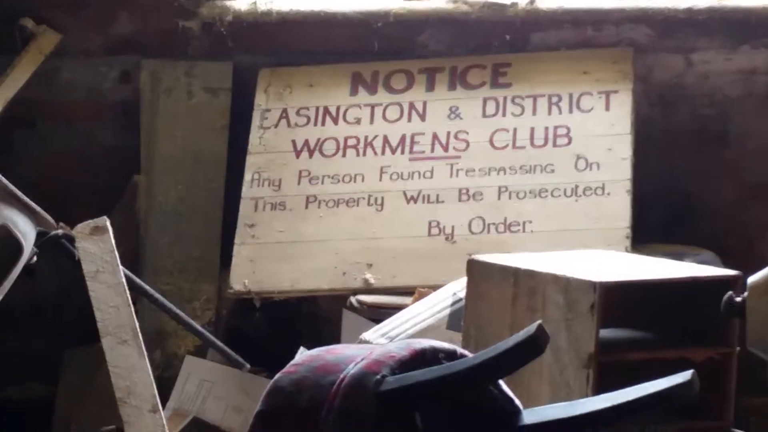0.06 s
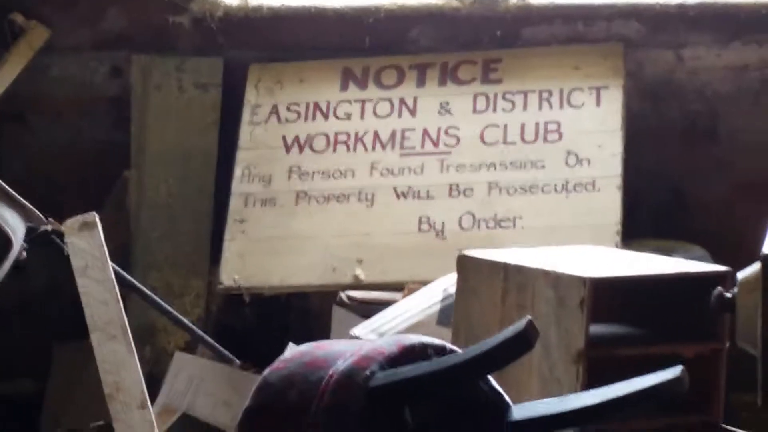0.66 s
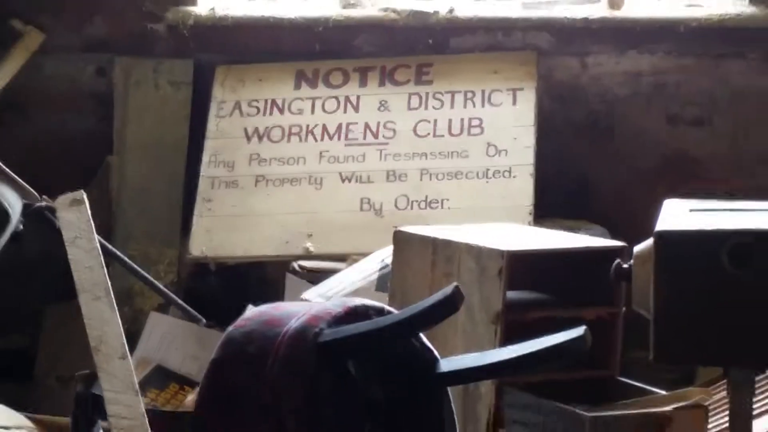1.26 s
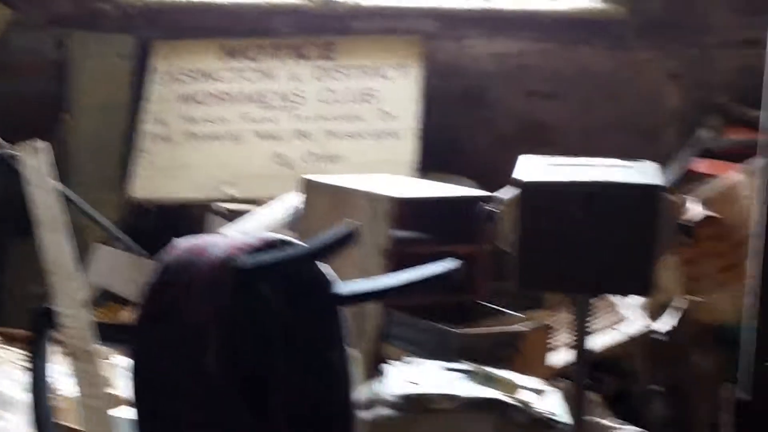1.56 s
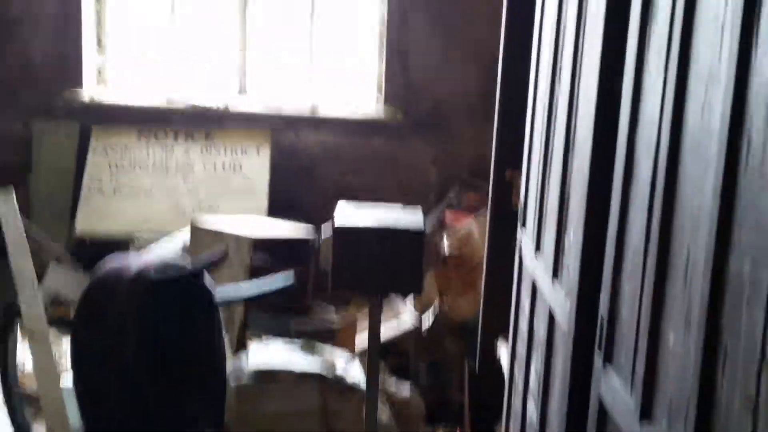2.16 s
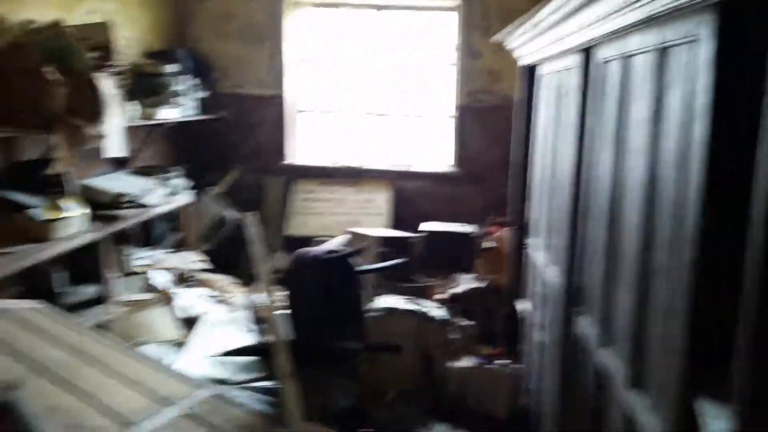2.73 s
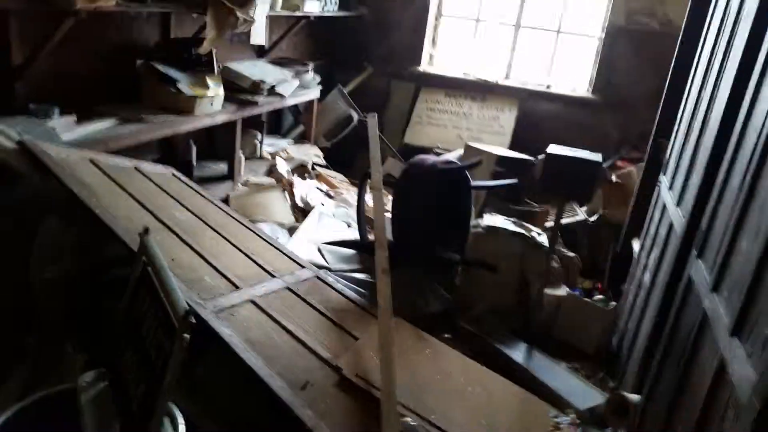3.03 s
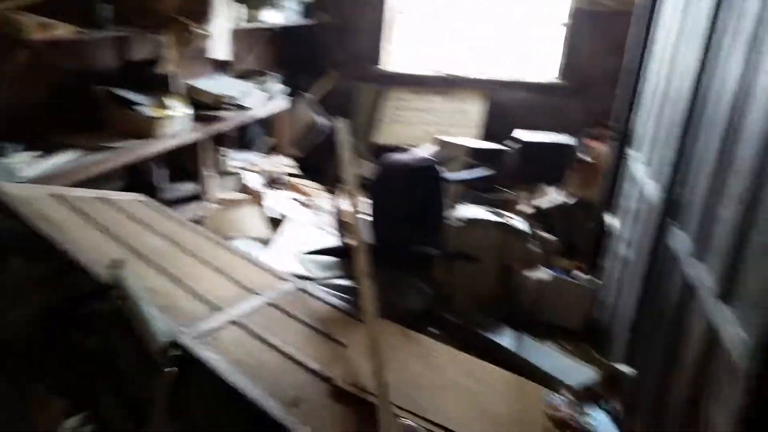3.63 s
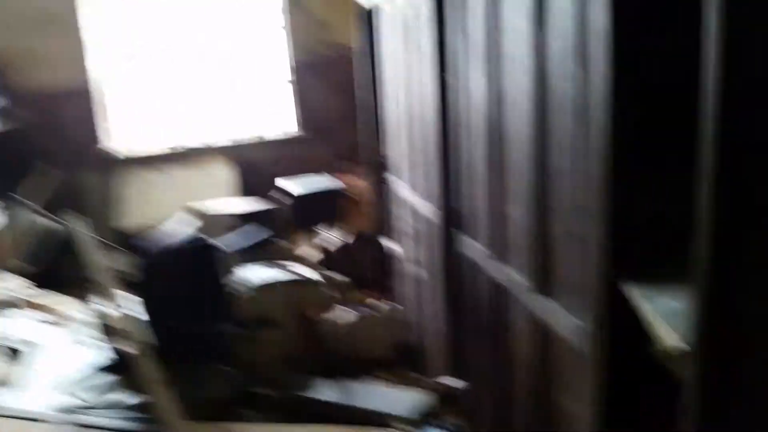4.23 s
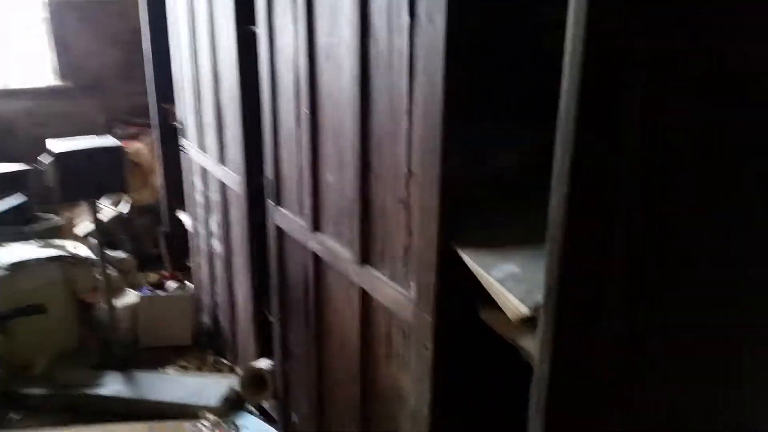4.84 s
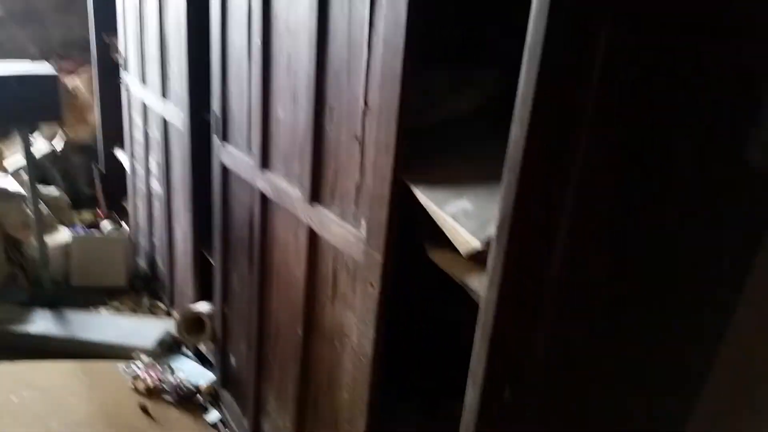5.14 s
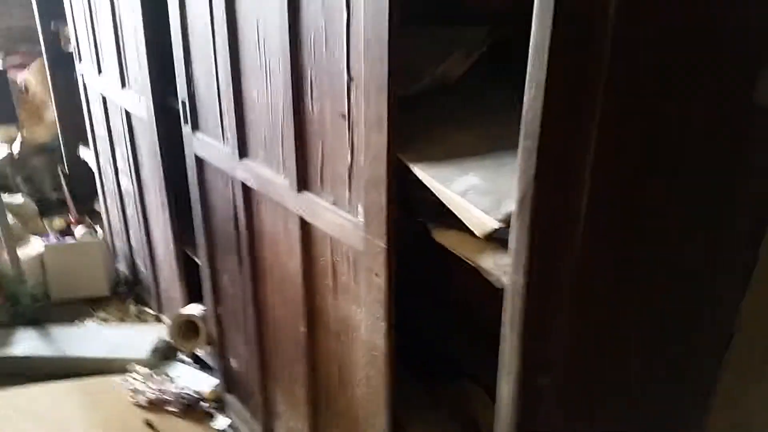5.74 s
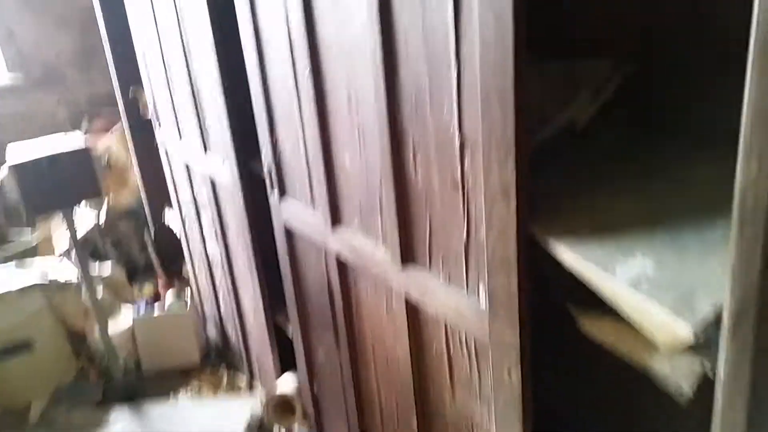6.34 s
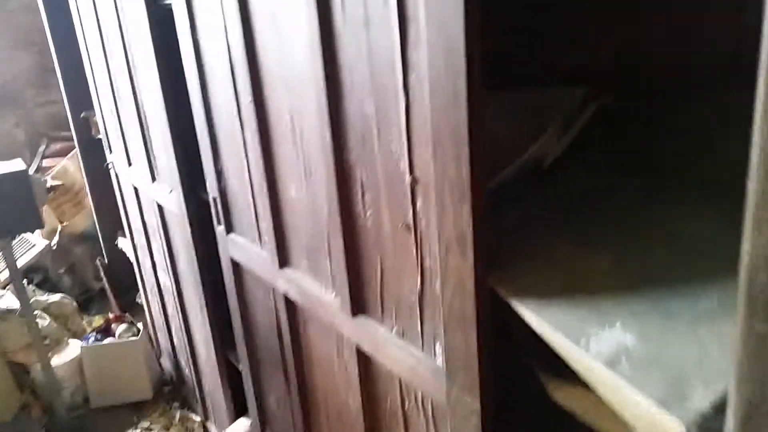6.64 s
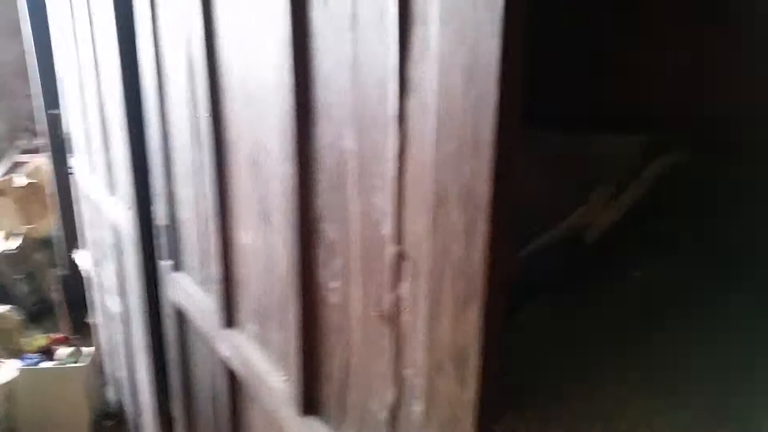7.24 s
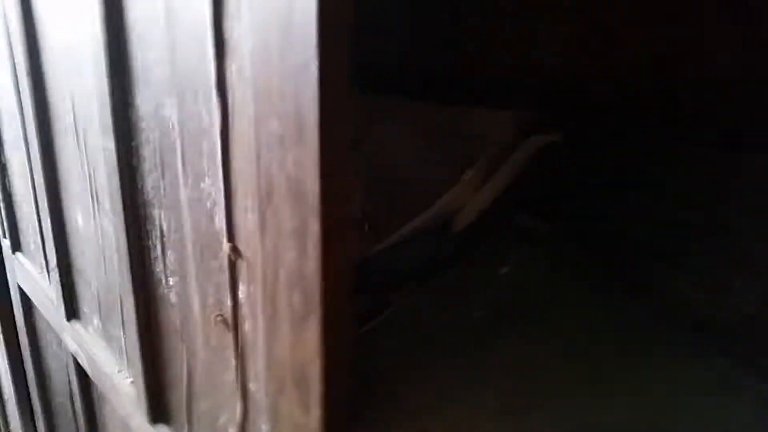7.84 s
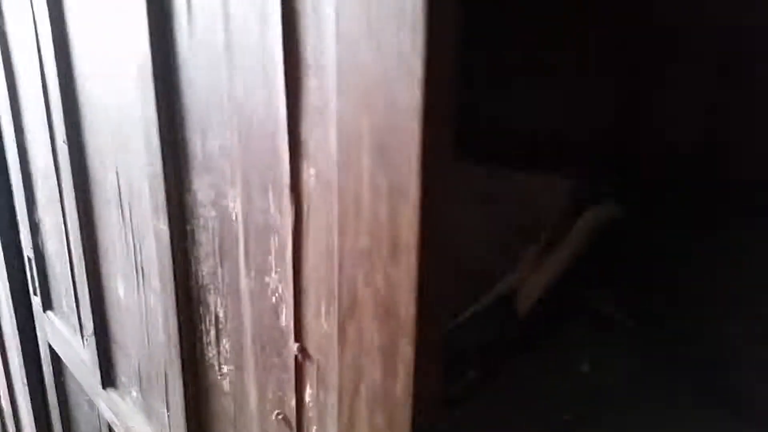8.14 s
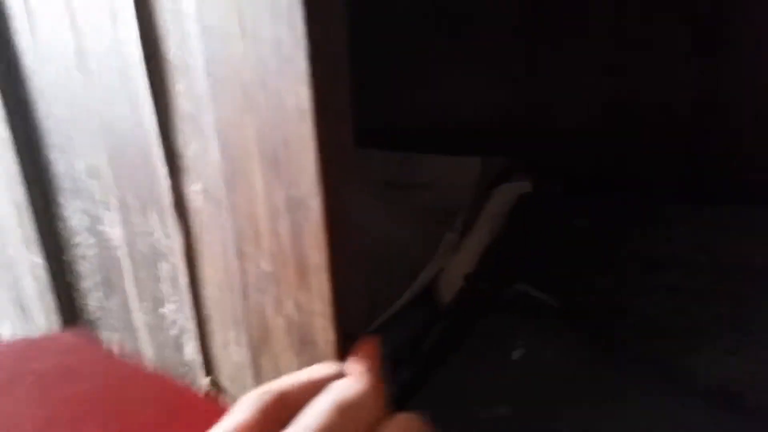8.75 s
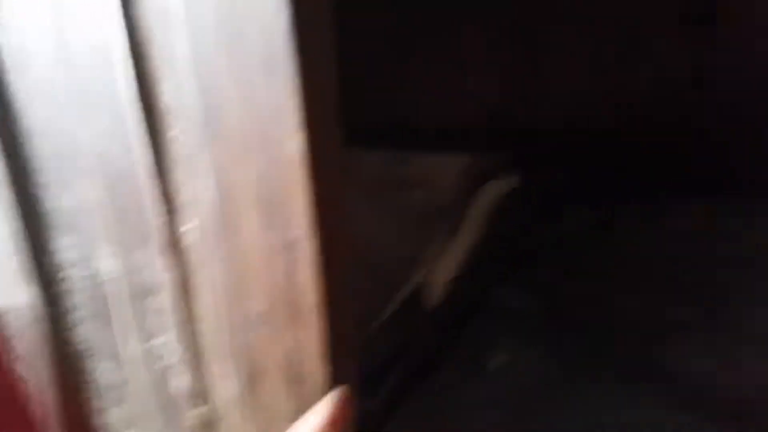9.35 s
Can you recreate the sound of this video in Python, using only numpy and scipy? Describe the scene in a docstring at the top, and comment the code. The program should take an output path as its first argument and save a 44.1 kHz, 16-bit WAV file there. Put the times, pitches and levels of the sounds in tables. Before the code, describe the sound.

At first there is only faint hiss and a low rumble of air on the microphone, with a soft handling bump just before 1 second. From about 1.9 seconds, footsteps crunch over rubble, grit and loose boards, and single pieces snap, ringing briefly in a small room. The microphone is bumped again near 3 seconds. More steps and sharp cracks follow until about 4.7 seconds, with a thin squeak and a shard's clink near 4.4. After a short lull, the crunching resumes around 5.7 seconds, with brief squeaks near 6, a snap and light clinks near 6.4. At 7.6 and 7.9 seconds come two heavy, dull knocks on a wooden cupboard amid continued crunching, and another at 8.7. Around 9 seconds a shard clinks, and more thumps and cracks sound as a hand grips the cupboard door, with low handling rumble lasting to the end at 9.5 seconds.

```python
"""Someone crosses a derelict room to a wooden cupboard. Air rumbles faintly on the microphone, a piece
squeaks, and handling bumps the microphone, again near 3 s. From 1.9 s feet crunch over rubble: each step
is a shower of tiny fractures that sound in loose boards, rubble and grit. Single pieces snap, shards
clink, and the small room rings on. From 7.6 s come heavy knocks on wood. Near 9 s a hand takes hold of
the cupboard door, and its handling rumble joins the draught."""
import sys
import numpy as np
from scipy import signal
from scipy.fft import rfft, irfft
from scipy.io import wavfile

SR = 44100
rng = np.random.default_rng(int(sys.argv[2]) if len(sys.argv) > 2 else 0)


def pcm_store(signal):
    """Save signal as 16-bit PCM."""
    levels = np.round(np.clip(np.atleast_2d(signal), -1, 1) * 32767)
    wavfile.write(sys.argv[1], SR, levels.astype(np.int16).T)


N = 418509
TIME = np.arange(N) / SR
PORT_LAG_S = .00036  # longest travel time between the two microphone ports


def undb(db):
    """Decibels to gain."""
    return 10 ** (np.asarray(db) / 20)


def unit(x):
    """Scale to rms 1."""
    return x / np.sqrt(np.mean(x ** 2) + 1e-18)


def curve(rows, at_s=TIME):
    """Linear interpolation of (time, value) rows."""
    return np.interp(at_s, *np.transpose(rows))


def colour(x, points):
    """Minimum-phase filter with a (Hz, dB) outline, falling 20 dB per octave beyond its ends."""
    hz, db = np.transpose(points)
    size = 4096
    octave = np.log2(np.maximum(np.fft.rfftfreq(size, 1 / SR), 10))
    beyond = np.abs(octave - np.clip(octave, np.log2(hz[0]), np.log2(hz[-1])))
    gain = undb(np.interp(octave, np.log2(hz), db) - 20 * beyond)
    cepstrum = irfft(np.log(gain))
    cepstrum[1:size // 2] *= 2
    cepstrum[size // 2 + 1:] = 0
    impulse = irfft(np.exp(rfft(cepstrum)))
    return signal.fftconvolve(x, impulse[None], axes=1)[:, :x.shape[1]]


def ring(x, hz, width_hz):
    """One resonance, gain 1 at its centre."""
    return signal.lfilter(*signal.iirpeak(hz, hz / width_hz, fs=SR), x)


def add(out, start_s, sound):
    """Mix in a short stereo sound."""
    i = int(start_s * SR)
    out[:, i:i + sound.shape[1]] += sound[:, :out.shape[1] - i]


def shower(per_s, spread_db, size=N):
    """Random clicks, each from its own direction: bass alike in both ports, treble not."""
    when, strength, direction = rng.random((int(per_s * size / SR), 3)).T
    polarity = (-1) ** np.arange(len(when))
    gain = polarity * undb(-spread_db * np.log(np.maximum(strength, .004)))
    lag = (2 * direction - 1) * PORT_LAG_S * SR / 2
    arrivals = [(when * size + side * lag).astype(int) % size for side in (1, -1)]
    return unit(np.array([np.bincount(port, gain, size) for port in arrivals]))


def wander(per_s):
    """Random values joined by straight lines; spread near 1."""
    return np.interp(TIME * per_s, np.arange(N // 20), rng.standard_normal(N // 20)) * np.sqrt(3 / 2)


def port_time(direction, size):
    """Seconds since a sound reached each port; direction 0 is left, 1 is right."""
    return np.maximum(TIME[:size] - PORT_LAG_S * np.array([[direction], [1 - direction]]), 0)


def struck(modes, hz, t60_s, size):
    """Free ringing of a small piece; higher modes die sooner."""
    t = port_time(rng.random(), size)
    return sum(undb(db - 60 * t * k / t60_s) * np.sin(2 * np.pi * hz * k * t) for k, db in modes)


# hiss spectrum (frequency [Hz], density [dB])
HISS_SPECTRUM = [(150, 1), (300, -8.5), (600, -15.5), (1150, -18), (1600, -24.5), (2800, -33), (3600, -22),
                 (5200, -43.5), (13500, -42)]
# hiss envelope (time [s], level [dB])
HISS_LEVEL = [(0, -61.5), (1.85, -62.5), (2.3, -72), (5.3, -70), (9.49, -58)]
# microphone rumble spectrum (frequency [Hz], density [dB])
RUMBLE_SPECTRUM = [(25, -12), (60, 3), (100, -3), (170, -16), (400, -32)]


def background(steps, draught_db=8.5, jolt_db=-32.5, settle_s=.11, grip_db=-33, grip_s=9.05):
    """Faint hiss; the microphone rumbles with the draught, each step's jolt and the hand's grip."""
    air = undb(curve(HISS_LEVEL))
    pole = np.exp(-1 / (settle_s * SR))
    jolt = np.sqrt(signal.lfilter([1 - pole], [1, -pole], steps[0] ** 2))
    grip = np.clip((TIME - grip_s) / .022, 0, 1)
    buffeting = undb(draught_db) * air + undb(jolt_db) * jolt + undb(grip_db) * grip
    rumble = unit(colour(shower(per_s=2500, spread_db=5), RUMBLE_SPECTRUM))
    rumble *= buffeting * undb(.54 * wander(per_s=11))
    hiss = unit(colour(shower(per_s=170000, spread_db=1.5), HISS_SPECTRUM)) * air
    left_over_right_db = curve([(2.8, 8), (3.4, -2.5), (9.0, -6)])
    return (rumble + hiss) * undb(np.array([left_over_right_db, -left_over_right_db]) / 2)


# standing waves (frequency [Hz], t60 [s], gain [dB])
ROOM_MODES = [(75.8, 4.8, 9.5), (219, 1.2, -10), (236.7, 0.7, 2)]


def room(x, wet_db, low_t60_s=.6, high_t60_s=.36):
    """Adds a small room's dense echoes; the treble dies first and standing waves linger."""
    t = TIME[:SR * 3 // 4]
    echoes = shower(per_s=12000, spread_db=3, size=len(t)) * (1 - np.exp(-t / .0025))
    low = signal.sosfilt(signal.butter(1, 1500, fs=SR, output="sos"), echoes)
    tail = low * undb(-60 * t / low_t60_s) + (echoes - low) * undb(-60 * t / high_t60_s)
    reverb = signal.fftconvolve(x, unit(tail) / np.sqrt(len(t)), axes=1)[:, :N]
    standing = sum(undb(db) * ring(x.mean(0), hz, np.log(1000) / np.pi / t60_s)
                   for hz, t60_s, db in ROOM_MODES)
    return x + standing + undb(wet_db) * reverb


# rubbing pieces (time [s], length [s], pitch [Hz], level [dB])
SQUEAKS = [(.22, 0.17, 1170, -61), (4.383, 0.14, 8640, -40), (5.798, 0.042, 1271, -26),
           (6.006, 0.036, 1264, -14.5), (6.195, 0.0055, 1930, -13.5), (6.951, 0.0058, 746, -27.5)]


def squeaks(waver_hz=85):
    """Brief stick and slip keeps one narrow resonance of a piece ringing."""
    out, waver = np.zeros((2, N)), wander(per_s=300)
    for start_s, length_s, hz, db in SQUEAKS:
        t = TIME[:int(length_s * SR)]
        pitch_hz = hz + waver_hz * waver[int(start_s * SR):][:len(t)]
        tone = np.sin(2 * np.pi * np.cumsum(pitch_hz) / SR)
        swell = np.sin(np.pi * t / length_s)
        add(out, start_s, undb(db) * swell * tone * np.ones((2, 1)))
    return out


# shard modes (pitch ratio [1], level [dB])
SHARD_MODES = [(1, -4.5), (.72, -13), (1.19, -10.5)]
# shard contacts (time [s], level [dB], pitch [Hz], t60 [s])
CLINKS = [(4.406, -28, 9100, 0.069), (4.407, -38.5, 3850, 0.27), (4.444, -33, 3850, .06),
          (6.39, -27, 2830, 0.083), (6.414, -21.5, 2746, .1), (6.459, -22, 2990, 0.063),
          (6.866, -25.5, 3740, 0.022), (9.013, -16, 5290, 0.088)]


def clinks(chatter_db=5, chatter_t60_s=.04):
    """Hard shards chatter as they touch, then ring on at their own pitch."""
    out, t = np.zeros((2, N)), TIME[:SR // 8]
    for start_s, db, hz, t60_s in CLINKS:
        chatter = shower(per_s=16000, spread_db=-6.5, size=len(t))
        chatter *= undb(chatter_db - 60 * t / chatter_t60_s)
        tone = struck(SHARD_MODES, hz, t60_s, len(t))
        add(out, start_s, undb(db) * (tone + ring(chatter, hz, hz / 2)))
    return out


# handling bumps on the microphone at .829, 2.772 and 3.009 s, otherwise heel or hand on wood
# (time [s], level [dB], pitch [Hz], t60 [s])
THUMPS = [(.829, -15, 150, 0.022), (2.007, -26, 258, 0.16), (2.089, -24.5, 231, 0.5),
          (2.772, -25, 110, .065), (3.009, -8.5, 120, 0.015), (5.236, -48, 230, .12),
          (5.466, -27.5, 195, 0.14), (5.875, -11, 247, 0.047), (6.95, -22, 239, 0.066),
          (7.623, 5, 196, 0.082), (7.865, 2.5, 181, 0.068), (8.358, -24, 228, 0.085),
          (8.719, -0.5, 216, 0.075), (9.069, -3.5, 130, 0.06), (9.119, -4.5, 97, 0.11),
          (9.307, -8.5, 174, 0.24)]


def thumps(gain_db=-5, rise_s=.0052, contact_db=7, contact_t60_s=.04):
    """A bump on the microphone or a knock on wood: a damped low swing and a short dull contact noise."""
    out, t = np.zeros((2, N)), TIME[:SR // 2]
    for start_s, db, hz, t60_s in THUMPS:
        swing = np.sin(2 * np.pi * hz * t) * undb(-60 * t / t60_s) * (1 - np.exp(-t / rise_s))
        contact = shower(per_s=2200, spread_db=-1, size=len(t))
        contact *= undb(contact_db - 60 * t / contact_t60_s)
        thud = ring(ring(contact, hz, 300), hz, 340)
        add(out, start_s, undb(db + gain_db) * (swing + thud))
    return signal.sosfilt(signal.butter(2, 1900, fs=SR, output="sos"), out)


# wood resonances (frequency [Hz], width [Hz], gain [dB])
WOOD_MODES = [(360, 40, -12), (510, 60, -11)]


def wood(x):
    """Boards and panels add their resonances to whatever shakes them."""
    return x + sum(undb(db) * ring(x, hz, width_hz) for hz, width_hz, db in WOOD_MODES)


# modes of a snapped piece (pitch ratio [1], level [dB])
PIECE_MODES = [(1, 2.5), (.45, -11.5), (1.72, -19.5)]
# breaking pieces (time [s], level [dB], relative edge level [dB], pitch [Hz])
SNAPS = [(1.867, -22.5, -6, 1200), (1.999, -27, 17, 1680), (2.06, -19.5, 12.5, 1690), (3.394, -13, -3, 617),
         (3.5263, -10, 2.5, 1556), (3.747, -18.5, -8, 839), (4.674, -23.5, -10, 1435),
         (5.234, -55, -26, 1110), (5.9388, -17.5, -24, 1350), (6.1714, -9.5, 1, 1527),
         (6.7008, -35.5, 3, 1365), (7.108, -24, 4, 1100), (7.506, -23, -3, 1700), (7.926, -11.5, -3, 827),
         (8.0633, -23, 2, 970), (8.36, -22.5, -9, 745), (8.461, -24, 11, 790), (8.824, -13, -15, 2444),
         (8.897, -9.5, -0.5, 1030), (9.0129, -12, 1, 1750), (9.0672, -19, 7, 980), (9.26, -13.5, 7.5, 1100),
         (9.348, -13.5, -19, 2925), (9.352, -5.5, -30, 574)]


def snaps(crack_t60_s=.069, body_db=4, edge_trim_db=-5, tone_db=-7, tone_t60_s=.045):
    """A piece breaks in a quick run of cracks with a woody body and a bright edge, and rings briefly."""
    out, t = np.zeros((2, N)), TIME[:SR // 8]
    for start_s, db, edge_db, hz in SNAPS:
        crack = shower(per_s=9000, spread_db=2, size=len(t)) * undb(-60 * t / crack_t60_s)
        body = undb(body_db) * ring(ring(crack, hz, 2 * hz), hz, 2 * hz)
        tone = undb(tone_db) * struck(PIECE_MODES, hz, tone_t60_s, len(t))
        edge = undb(edge_db + edge_trim_db) * ring(crack, 7500, 5600)
        add(out, start_s, undb(db) * (body + tone + edge))
    return wood(out)


def chips(per_s=1100, t60_cycles=36, spread_db=2.5):
    """Chips of wood and plaster, each ringing briefly at its own pitch."""
    size = N // 3 + 1
    out = np.zeros((2, size))
    for when, pitch, strength, direction in rng.random((int(per_s * size / SR), 4)):
        hz = 380 * 8 ** pitch
        t = port_time(direction, int(t60_cycles / hz * SR))
        tone = np.sin(2 * np.pi * hz * t) * undb(-60 * hz * t / t60_cycles)
        gain = hz * undb(-spread_db * np.log(max(strength, .02)))
        add(out, when * size / SR, gain * tone)
    return unit(np.tile(out, 3)[:, :N])


# spectra of fractures in boards, rubble and grit (frequency [Hz], density [dB])
BOARD_SPECTRUM = [(50, -15), (80, 4.5), (120, 2), (200, 1.5), (400, -2), (500, -10.5), (750, -10.5)]
RUBBLE_SPECTRUM = [(250, -26), (480, -2), (800, 5), (1400, -0.5), (1800, 1.5), (2500, -6), (3500, -8.5),
                   (6000, -33)]
GRIT_SPECTRUM = [(2000, -2), (3800, -3.5), (5200, -7.5), (8700, -4), (10500, -8.5), (14500, -14)]


def debris(slips_per_s=75, coarse_slip_db=.68, fine_slip_db=2, chips_db=-5):
    """Debris yields in jerks: big fractures and chips shake boards and rubble, small ones hiss as grit."""
    drag = wander(slips_per_s)
    coarse = wood(shower(per_s=8000, spread_db=2.5) + undb(chips_db) * chips())
    coarse *= undb(coarse_slip_db * drag)
    fine = shower(per_s=12000, spread_db=0) * undb(fine_slip_db * (drag / 2 + wander(slips_per_s)))
    return np.array([colour(coarse, BOARD_SPECTRUM), colour(coarse, RUBBLE_SPECTRUM),
                     colour(fine, GRIT_SPECTRUM)])


RISE_S = {"stamp": .001, "tread": .0055, "slide": .019}
# floor pitch under a full step (time [s], pitch [Hz])
FLOOR_PITCH = [(1.9, 355), (3.2, 299), (3.8, 305), (4.5, 400), (5.6, 267), (6, 283), (7.6, 240), (8.6, 339),
               (9.1, 230)]
# loose plank modes (pitch ratio [1], gain [dB])
PLANK_MODES = [(1, 3), (2.3, -7.5), (4.1, -8)]
# steps (time [s], contact, length [s], level [dB], boards re rubble [dB], grit re rubble [dB])
STEPS = [(.97, "slide", .13, -66, 11, -20), (1.864, "slide", 0.097, -23, -3.5, -2),
         (1.998, "stamp", 0.04, -41, 1.5, 14.5), (2.061, "stamp", .12, -34.5, -8, 5),
         (2.58, "tread", 0.066, -62, 4, -30), (2.94, "slide", 1, -60.5, 14, -23),
         (3.005, "stamp", 0.15, -37.5, -20.5, -8), (3.142, "tread", 0.094, -27.5, -8.5, -7.5),
         (3.371, "tread", 0.22, -23.5, -3, -7), (3.51, "tread", 0.17, -30.5, 1, -6.5),
         (3.738, "slide", 0.095, -26, 2.5, -5), (3.787, "stamp", .13, -16.5, -4, -3.5),
         (4.16, "slide", 0.17, -58, 8.5, 7.5), (4.39, "slide", 0.18, -48.5, 3, 10),
         (4.465, "slide", 0.072, -24.5, -6.5, 1), (5.46, "tread", 0.23, -50.5, 12, -11.5),
         (5.69, "slide", 0.65, -41, 0, -4.5), (5.795, "stamp", 0.11, -31, 4, -3),
         (5.92, "stamp", 0.15, -32.5, -1, -6.5), (5.99, "tread", 0.16, -20, -1.5, -5.5),
         (6.13, "stamp", 0.2, -29.5, 0.5, 3.5), (6.26, "stamp", 0.082, -27.5, -0.5, -14),
         (6.39, "slide", 0.12, -37.5, 0, 2.5), (6.55, "slide", 1, -58.5, 3.5, 2.5),
         (6.93, "tread", 0.27, -42, -0.5, 1), (7.105, "tread", 0.21, -39.5, -0.5, -28),
         (7.27, "slide", 0.29, -53, 2.5, -0.5), (7.505, "stamp", 0.073, -25, -0.5, -7),
         (7.56, "slide", 0.094, -16, 1.5, -10.5), (7.66, "stamp", .15, -22, -3.5, -13.5),
         (7.82, "tread", 0.21, -27, 2, -10), (7.92, "stamp", 0.33, -46, 8.5, 1),
         (8.3, "slide", 0.18, -42.5, 1, -5), (8.46, "stamp", 0.13, -25.5, -2.5, -9.5),
         (8.56, "slide", 0.39, -26, 4, -3), (8.68, "tread", 0.27, -22, 1, -6.5),
         (9.01, "stamp", 0.12, -23.5, -4, -0.5), (9.18, "stamp", 0.11, -23.5, -1, 1.5),
         (9.3, "stamp", 0.036, -28.5, 14.5, -17), (9.348, "stamp", 0.04, -17, -8, -27)]


def footsteps(full_step_db=-21.5, octaves_per_db=.009, plank_spread_octaves=.24, plank_q=14,
              glint_db=-3, glint_hz=(5030, 9760)):
    """Each step crushes fresh debris on a loose plank, which sounds lower under a lighter foot."""
    layers = debris()
    out = np.zeros((2, N))
    for i, (start_s, contact, length_s, db, boards_db, grit_db) in enumerate(STEPS):
        t = TIME[:int(2 * length_s * SR)]
        boards, rubble, grit = layers[:, :, i * SR // 5:][:, :, :len(t)]
        force = (1 - np.exp(-t / RISE_S[contact])) * np.exp(-(t / length_s) ** 3)
        floor_hz = curve(FLOOR_PITCH, start_s) * 2 ** (octaves_per_db * (db - full_step_db))
        hollow = ring(boards, floor_hz, .8 * floor_hz)
        plank_hz = floor_hz * 2 ** (plank_spread_octaves * rng.standard_normal())
        plank = sum(undb(mode_db) * ring(rubble, k * plank_hz, k * plank_hz / plank_q)
                    for k, mode_db in PLANK_MODES)
        glint = undb(glint_db) * ring(grit, rng.uniform(*glint_hz), 600)
        crunch = unit(force * (rubble + plank))
        crunch += undb(boards_db) * unit(force * hollow)
        crunch += undb(grit_db) * unit(force * (grit + glint))
        add(out, start_s, crunch * undb(db) * np.sqrt(np.mean(force ** 2)))
    return out


# balance of feet and cupboard (time [s], right over left [dB])
BALANCE = [(6.3, 0.5), (6.7, 2), (7.3, -1), (7.6, 2.5), (8.7, 0.6)]


def scene(shadow_depth=.38):
    """Feet and cupboard are slightly to the right; the left port is shadowed broadly around 1.7 kHz."""
    steps = footsteps()
    pieces = snaps() + squeaks() + clinks()
    left, right = room(steps, wet_db=-7) + room(pieces, wet_db=-6) + room(thumps(), wet_db=-9)
    left = left - shadow_depth * ring(left, 1700, 6400)
    balance_db = curve(BALANCE)
    return np.array([left, right]) * undb(np.array([-balance_db, balance_db]) / 2) + background(steps)


def record(dry):
    """Soft clipping of the loudest peaks, then a steep low-pass at 15.1 kHz."""
    return signal.sosfilt(signal.ellip(10, .2, 70, 15100, fs=SR, output="sos"), np.tanh(dry))


dry = scene()
out = record(dry)
pcm_store(out)
```